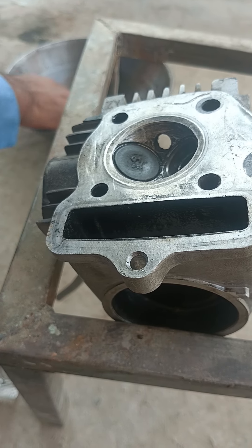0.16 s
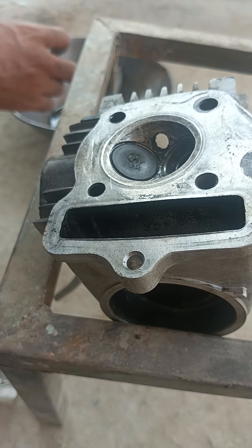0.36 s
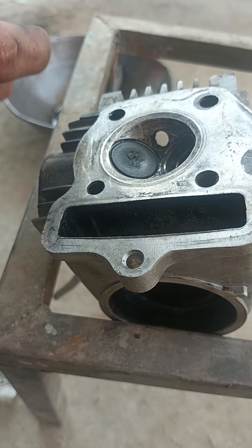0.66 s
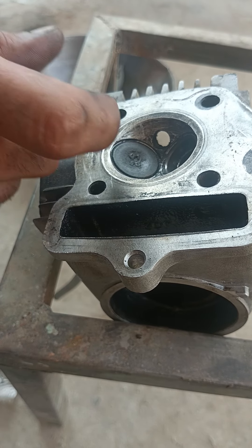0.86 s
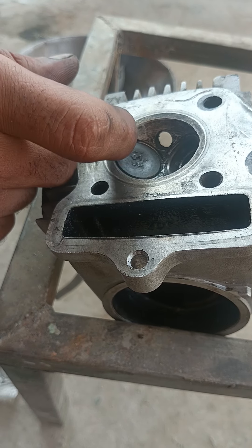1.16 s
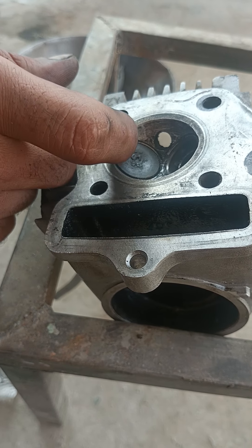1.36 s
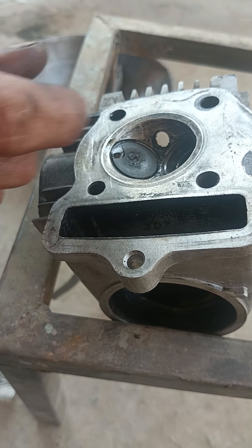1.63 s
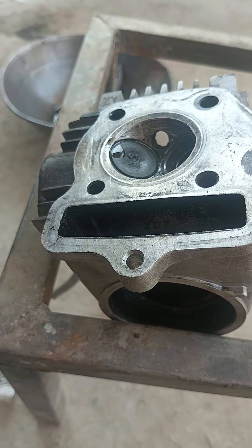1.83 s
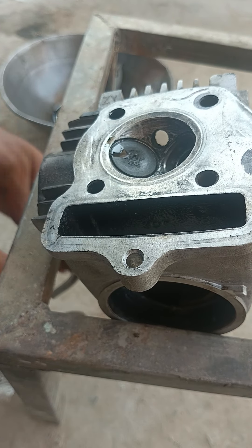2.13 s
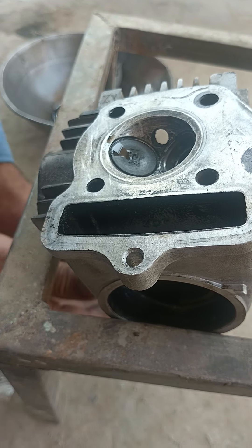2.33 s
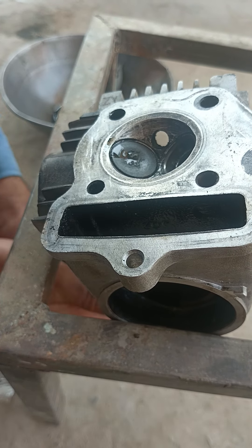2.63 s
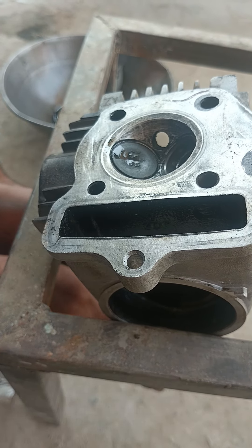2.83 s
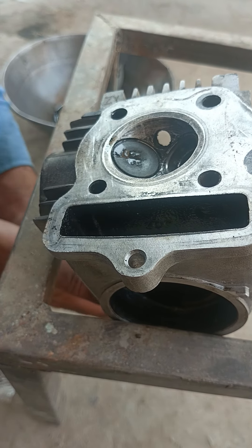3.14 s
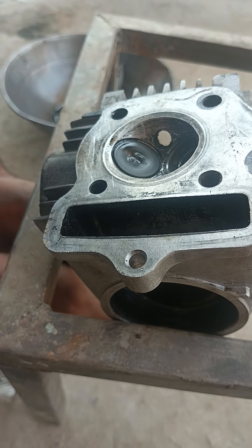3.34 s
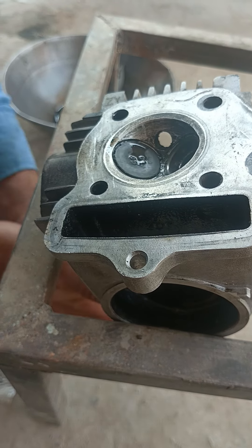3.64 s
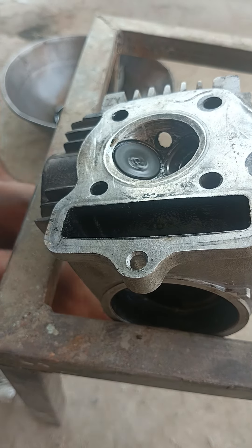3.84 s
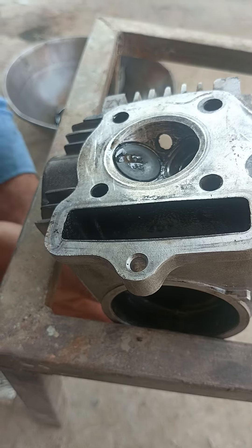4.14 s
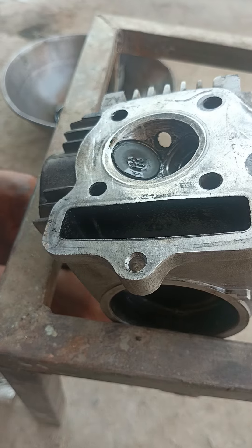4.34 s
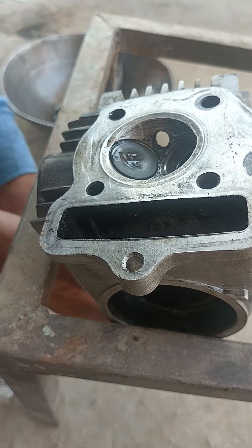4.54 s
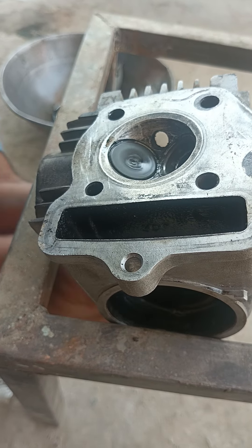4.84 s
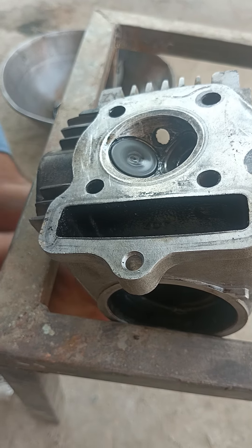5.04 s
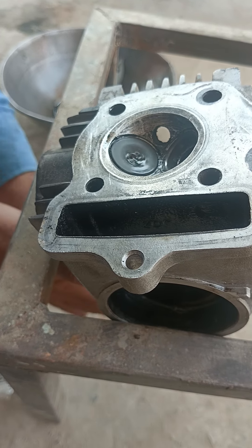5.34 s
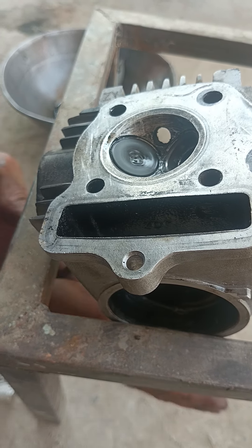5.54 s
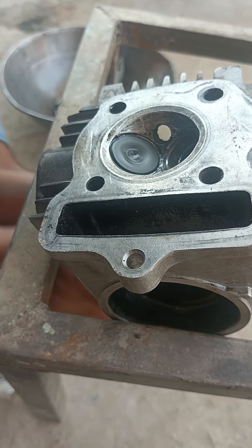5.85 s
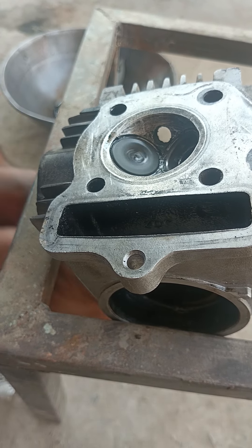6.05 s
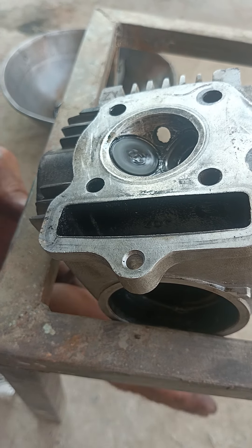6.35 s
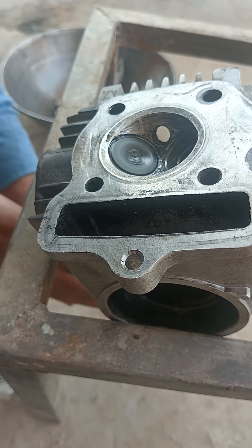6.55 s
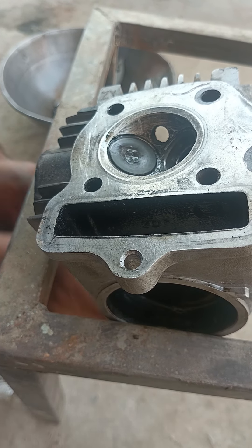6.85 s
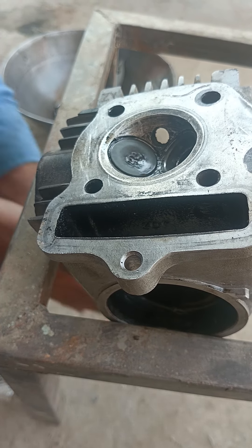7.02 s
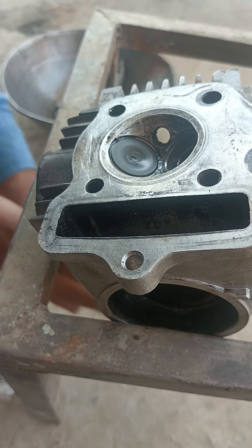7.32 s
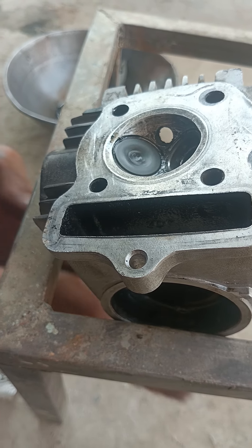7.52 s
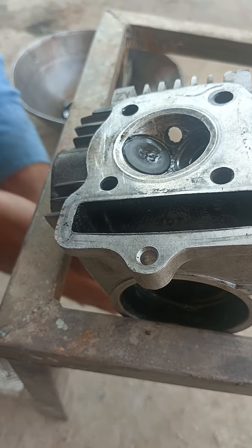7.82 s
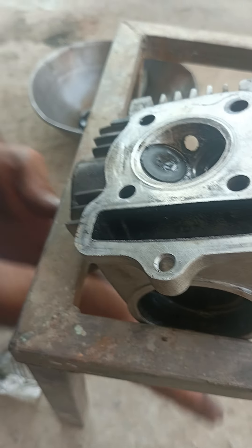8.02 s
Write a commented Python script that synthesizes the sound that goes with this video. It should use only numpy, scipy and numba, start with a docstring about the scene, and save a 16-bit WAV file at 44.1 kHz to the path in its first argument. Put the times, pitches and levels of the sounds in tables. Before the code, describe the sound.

A single-cylinder engine moves away along the street, its low exhaust pulsing and fading with the road noise while a distant engine hums at idle. After about three seconds, close by in an open workshop, a valve is twisted back and forth by hand in a metal cylinder head. Grinding paste crunches and the stem chatters in quick, even strokes, each with a brief high ringing squeak.

```python
"""A valve is lapped (ground into its seat) by hand in a small aluminium cylinder head, close by.
Each twist crushes grinding paste: the grit crackles through the head, the stem chatters, and the
valve catches and sings one high note. The workshop is open, so the street is heard too, alone for
the first three seconds: a single-cylinder engine moves away with its exhaust pulsing, road noise
fades, and a far engine keeps idling."""
import sys
import numpy as np
from scipy import signal
from scipy.fft import rfft, irfft
from scipy.io import wavfile
from scipy.ndimage import uniform_filter1d
from numba import njit

SR = 44100
rng = np.random.default_rng(int(sys.argv[2]) if len(sys.argv) > 2 else 0)


def unload_audio(sound):
    """Save the sound as a 16-bit wav file, at the path given as the first command line argument."""
    columns = np.transpose(np.atleast_2d(sound))
    # keep every value between -1 and 1, then stretch to whole-number steps
    steps = np.round(np.clip(columns, -1, 1) * 32767)
    wavfile.write(sys.argv[1], SR, steps.astype(np.int16))


N = 360738
T = np.arange(N) / SR

# How fast the departing engine fires. Each row: time in seconds, firings per second.
FIRING_RATE = [(0, 32.7), (1.4, 32.2), (2.6, 33), (4.3, 34.05), (7.8, 34.4), (7.95, 36.6)]
# How loud its exhaust is. Each row: time in seconds, level in dB.
EXHAUST_LEVEL = [(0, -16), (.2, -14), (.28, -17), (.77, -12), (1.05, -16), (1.3, -19.5), (2.05, -26),
                 (2.2, -23.8), (2.8, -28), (3.4, -29.8), (3.8, -34), (4.7, -37.5), (6.3, -39.5),
                 (8.18, -39.5)]
# The pitch that the street boosts as the vehicle moves. Each row: time in seconds, pitch in Hz.
BOOM_PITCH = [(0, 162), (.45, 165), (.65, 195), (1, 131), (1.25, 135), (1.6, 168), (5.5, 160), (6.8, 138)]
# The hum of the idling engine. Each row: time in seconds, pitch in Hz.
IDLE_PITCH = [(0, 103), (1.6, 102.8), (2.6, 101.6), (4.6, 101.6), (5.8, 103)]
# How loud that hum is. Each row: time in seconds, level in dB.
IDLE_LEVEL = [(0.0, -36), (0.5, -26), (1.91, -38), (1.98, -30), (2.25, -38), (2.66, -29), (2.8, -38),
              (3.23, -25), (3.74, -37), (5.06, -41), (5.9, -36), (6.27, -56), (7.22, -39), (7.36, -48),
              (8.0, -43), (8.18, -48)]
# How loud the street is. Each row: time in seconds, road rumble in dB, tyre hiss in dB.
STREET_LEVELS = [(0, -35.3, -41.3), (1, -35.3, -42.5), (1.75, -33.3, -41.8), (2.5, -37.7, -48),
                 (3.4, -41.3, -54.5), (6.3, -51, -52.5), (8.18, -52, -52)]
# The traffic's faint whine: pitch in Hz, width in Hz, level in dB compared with the rumble.
TRAFFIC_WHINE = (1410, 30, -5)
# The tone of exhaust, road rumble and tyre hiss. Each row: frequency in Hz, relative level in dB.
EXHAUST_TONE = [(30, -39), (65, -24.5), (98, -17.5), (128, -2), (165, -2), (195, -1), (230, -12),
                (295, -2.5), (360, -8), (450, -21), (700, -29), (1500, -44.5), (8000, -100)]
RUMBLE_TONE = [(25, -25), (50, -17), (85, 0), (150, 9.5), (330, 6.5), (500, -1), (700, -1), (1000, 1),
               (1450, 1), (2000, -5.5), (3000, -11.5), (5000, -22), (9000, -42), (12000, -64)]
HISS_TONE = [(1000, -10), (3000, 3), (5000, 0), (7000, -5), (9000, -12.5), (10500, -27), (12000, -31),
             (15500, -31)]

# Forward twists pull the valve onto its seat. Each row: start, time to top speed and time to fade 20 dB
# in seconds, grit and chatter levels in dB, wait for the note and its length in seconds, note level in dB.
FORWARD_TWISTS = [(3.355, .078, .065, -36, -29, .04, .04, -27.5),
                  (3.663, .023, .115, -35, -31, .015, .012, -40),
                  (4.122, .047, .116, -28, -25.5, .03, .006, -22),
                  (4.537, .047, .125, -23.2, -25.5, .012, .058, -16),
                  (4.938, .062, .135, -24, -23, .015, .08, -20.5),
                  (5.335, .085, .068, -22.7, -24.5, .028, .06, -22.5),
                  (5.732, .112, .075, -23.5, -26.5, .048, .03, -18),
                  (6.14, .036, .15, -21.3, -26.5, .055, .04, -19),
                  (6.538, .06, .125, -21.5, -25.5, .07, .04, -17.8),
                  (6.955, .077, .13, -23, -29, .035, .075, -20.5),
                  (7.335, .072, .13, -22.3, -25.5, .015, .08, -27),
                  (7.747, .058, .15, -23.8, -27.5, .078, .065, -22.5),
                  (8.143, .03, .12, -25, -22, .025, .02, -22.5)]
# Return twists swell slowly and chatter late. The columns are the same.
RETURN_TWISTS = [(3.884, .094, .048, -30.8, -25.7, .028, .065, -27),
                 (4.318, .07, .085, -29.8, -29, .03, .036, -22.5),
                 (4.735, .088, .075, -29, -24.5, .045, .062, -24.5),
                 (5.135, .05, .17, -25.7, -25, .028, .035, -18),
                 (5.525, .08, .13, -28.3, -26, .04, .1, -26.5),
                 (5.929, .088, .095, -27.5, -27, .04, .06, -26),
                 (6.335, .091, .09, -25.3, -23.3, .07, .028, -24.5),
                 (6.735, .064, .08, -29.3, -31.5, .066, .023, -21),
                 (7.16, .09, .085, -27, -24.3, .068, .055, -19.5),
                 (7.55, .1, .04, -28, -27.5, .072, .03, -16), (7.96, .094, .09, -26, -29, .058, .052, -23)]
# What all twists in one direction share: fade-in in seconds, softer start of the grit in dB, time to
# strongest chatter in seconds, softer start of the chatter in dB, then the seconds that the chatter
# takes to fade 20 dB and the note to fade 60 dB.
FORWARD_SHAPE = (.01, 7.5, .068, 5, .12, .36)
RETURN_SHAPE = (.022, 10, .114, 20, .078, .24)
# The bite into fresh paste: level in dB, the grit level in dB that gives it, extra dB per dB of grit.
PASTE_BITE = (-25.5, -23, .35)
# One extra rattle of the loose stem: start, time to peak and time to fade 20 dB in seconds, level in dB.
STEM_RATTLE = (6.86, .055, .09, -33)
# The tone of crushed grit, stem chatter and shattering grains.
# Each row: frequency in Hz, relative level in dB.
GRIT_TONE = [(300, -41), (800, -16), (1500, -8), (2500, -8), (2850, -2), (3550, -4), (4300, 4), (4900, -6),
             (6800, -4), (7700, -13), (9000, -11), (10500, -17), (12000, -28), (15500, -25)]
CHATTER_TONE = [(400, -31), (800, -10), (1250, -8), (1600, -1), (2200, -3.5), (2500, -12), (2950, -7),
                (3550, -12), (4200, -8), (5000, -22), (8000, -55)]
SHATTER_TONE = [(3000, -22), (9000, 0.5), (10500, -1.5), (12000, -10), (13500, 0), (15500, 3)]
# How head and valve ring. Each row: pitch in Hz, width in Hz, height above the broad tone in dB.
HEAD_RINGS = [(1081, 16, 9.5), (1423, 12, 16.5), (1549, 56, 8), (1664, 13.7, 14), (1807, 11, 16),
              (2080, 12, 11), (2161.5, 16, 9.5), (3310, 79.5, 7), (3550, 10, 10), (3800, 12, 9),
              (4087, 14, 11), (4475, 25, 16), (5260, 23, 7), (5329, 42, 11), (5410, 75, 11.5),
              (5650, 29, 12), (5772, 28, 18), (5972, 17, 16), (6140, 18, 14), (6400, 44, 6), (6484, 34, 15),
              (6729, 22, 7), (7198, 24, 15.5), (7467, 29, 11), (8070, 25, 8.5), (8258, 22, 12.5),
              (8730, 54, 11.5), (9080, 38, 15.5), (9790, 16, 9), (12995, 50, 9)]

# The frequency range in which each sound's level is set: low edge and high edge in Hz.
EXHAUST_BAND, RUMBLE_BAND = (115, 420), (470, 750)
TREBLE_BAND, CHATTER_BAND, SHATTER_BAND = (4900, 10000), (1300, 2300), (10000, 15500)


def undb(db):
    """Turn decibels into a number to multiply by."""
    return 10 ** (np.asarray(db) / 20)


def unit(x):
    """Scale a signal to an average (rms) level of 1."""
    return x / np.sqrt(np.mean(x ** 2))


def curves(rows):
    """Join a table's rows with straight lines, giving one value per sample for each column after time."""
    times, *columns = np.transpose(rows)
    return [np.interp(T, times, column) for column in columns]


def wander(rate):
    """A smooth random wobble of size about 1, with `rate` new values a second."""
    hold = max(int(SR / rate), 1)
    steps = np.repeat(rng.standard_normal(N // hold + 1), hold)
    return unit(uniform_filter1d(uniform_filter1d(steps, hold), hold)[:N])


def shape_tone(x, tone, band, rings=(), size=16384):
    """Give a sound a broad tone and ringing peaks; white noise of level 1 ends at level 1 in `band`."""
    freqs = np.arange(size // 2 + 1) * SR / size
    tone_hz, tone_db = np.transpose(tone)
    gain = undb(np.interp(np.log(freqs + 1), np.log(tone_hz), tone_db))
    peaks = sum(undb(db) ** 2 / (1 + (2 * (freqs - hz) / width) ** 2) for hz, width, db in rings)
    gain *= np.sqrt(1 + peaks)
    in_band = (freqs > band[0]) & (freqs < band[1])
    gain /= np.sqrt(np.mean(gain ** 2 * in_band))
    # make the ringing come after each hit, never before it (minimum phase)
    cepstrum = irfft(np.log(gain))
    cepstrum[1:size // 2] *= 2
    cepstrum[size // 2 + 1:] = 0
    return signal.fftconvolve(x, irfft(np.exp(rfft(cepstrum))))[:N]


@njit
def resonance(x, hz, width_hz):
    """Let through a narrow band around a pitch that can move (a state-variable filter)."""
    out, band_state, low_state = np.empty(len(x)), 0., 0.
    for i in range(len(x)):
        tuning, damping = np.tan(np.pi * hz[i] / SR), width_hz / hz[i]
        band = (band_state + tuning * (x[i] - low_state)) / (1 + tuning * (tuning + damping))
        band_state = 2 * band - band_state
        low_state += 2 * tuning * band
        out[i] = damping * band
    return out


def reflections(x, centres_hz, width_hz):
    """Reflections hold back the frequencies near each centre, smearing the pulses (all-pass filters)."""
    radius = np.exp(-np.pi * width_hz / SR)
    for hz in centres_hz:
        poles = [1, -2 * radius * np.cos(2 * np.pi * hz / SR), radius * radius]
        x = signal.lfilter(poles[::-1], poles, x)
    return x


def departing_engine(scatter_db=1.5, jitter_s=.00015, gas_db=-10, boom_db=3.3, boom_width_hz=33.):
    """One exhaust pulse per firing with a puff of gas behind it, booming between the house fronts."""
    (rate,), (level_db,), (boom_hz,) = curves(FIRING_RATE), curves(EXHAUST_LEVEL), curves(BOOM_PITCH)
    cycles = (np.cumsum(rate) - 1.5 * rate[0]) / SR
    firings = np.flatnonzero(np.diff(np.floor(cycles)))
    timing, strength = rng.standard_normal((len(firings), 2)).T
    firings += (jitter_s * SR * timing).astype(int)
    pulses = np.zeros(N)
    pulses[np.clip(firings, 0, N - 1)] = undb(scatter_db * strength)
    gas = unit(np.exp(-(cycles % 1) / .98) * rng.standard_normal(N))
    puffs = unit(pulses) + undb(gas_db) * gas
    smeared = reflections(puffs, centres_hz=(135.3, 160, 190, 290.2, 335.3), width_hz=34)
    exhaust = shape_tone(smeared, EXHAUST_TONE, EXHAUST_BAND)
    boom = undb(boom_db) * resonance(exhaust, boom_hz, boom_width_hz)
    return unit(exhaust + boom) * undb(level_db - .4)


def idling_engine(lower_tone_db=-18):
    """A far engine hums at three times its firing rate, with a weaker tone at twice that rate."""
    (hz,), (level_db,) = curves(IDLE_PITCH), curves(IDLE_LEVEL)
    phase = 2 * np.pi * np.cumsum(hz + .41 * wander(8)) / SR
    hum = np.sin(phase) + undb(lower_tone_db) * np.sin(phase * 2 / 3)
    return np.sqrt(2) * undb(level_db - .2 + .7 * wander(12)) * hum


def road_noise():
    """Road rumble, tyre hiss and a faint whine, fading as the vehicle leaves."""
    rumble_db, hiss_db = curves(STREET_LEVELS)
    rumble = shape_tone(rng.standard_normal(N), RUMBLE_TONE, RUMBLE_BAND)
    rumble *= undb(rumble_db - .6 + .68 * wander(14))
    hiss = shape_tone(rng.standard_normal(N), HISS_TONE, TREBLE_BAND)
    hiss *= undb(hiss_db - .5 + .4 * wander(10))
    hz, width_hz, whine_db = TRAFFIC_WHINE
    whine = unit(resonance(rng.standard_normal(N), np.full(N, float(hz)), float(width_hz)))
    return rumble + hiss + undb(rumble_db + whine_db) * whine


def twist(start, peak_s, fade_s, soft_db, attack_s=.011):
    """The strength of one turn of the stem: it takes hold, gathers speed and slows to a stop."""
    during = (T > start) & (T < start + .5)
    age, strength = T[during] - start, np.zeros(N)
    swell_db = -soft_db * np.clip(1 - age / peak_s, 0, 1) ** 2
    fade_db = -20 * (np.maximum(age - peak_s, 0) / fade_s) ** 1.45
    strength[during] = np.minimum(age / attack_s, 1) * undb(swell_db + fade_db)
    return strength


def paste_bites(rise_s=.005, decay_s=.024):
    """The strength of the short crunch that starts each forward twist, greater when the twist is hard."""
    bite_db, usual_db, share = PASTE_BITE
    bite = np.zeros(N)
    for start, _, _, grit_db, *_ in FORWARD_TWISTS:
        gain = undb(bite_db + share * (grit_db - usual_db))
        bite += gain * np.clip((T - start) / rise_s, 0, 1) * np.exp(-np.abs(T - start) / decay_s)
    return bite


def valve_catch(start, length_s, ring_s, rise_s=.009):
    """The strength of one note: the valve catches, is driven for a moment, then rings down."""
    age = T - start
    rise = np.exp(-(np.minimum(age, 0) / rise_s) ** 2)
    return rise * undb(-60 * np.maximum(age - length_s, 0) / ring_s)


def hand_motion():
    """Twisting back and forth sets the grinding speed, the stem's wobble and the valve's swing."""
    speed, wobble, swing = np.zeros((3, N))
    for rows, shape in ((FORWARD_TWISTS, FORWARD_SHAPE), (RETURN_TWISTS, RETURN_SHAPE)):
        attack_s, grit_soft_db, chatter_peak_s, chatter_soft_db, settle_s, ring_s = shape
        for start, peak_s, fade_s, grit_db, chatter_db, wait_s, length_s, note_db in rows:
            speed += undb(grit_db) * twist(start, peak_s, fade_s, grit_soft_db, attack_s)
            wobble += undb(chatter_db) * twist(start, chatter_peak_s, settle_s, chatter_soft_db, attack_s)
            swing = np.maximum(swing, undb(note_db) * valve_catch(start + wait_s, length_s, ring_s))
    start, peak_s, fade_s, rattle_db = STEM_RATTLE
    wobble += undb(rattle_db) * twist(start, peak_s, fade_s, soft_db=11)
    return speed, wobble, swing


def grains(rate, spread_db):
    """Tiny cracks at random moments, about `rate` a second, a few much larger than the rest."""
    size = undb(spread_db * np.minimum(rng.exponential(size=N), 5))
    return unit((rng.random(N) < rate / SR) * size * rng.choice([-1, 1], N))


def cooling_fins(x, ring_s=.08, ring_db=-8):
    """The cooling fins and the steel stand ring briefly at many close pitches."""
    t = T[:SR // 2]
    tail = rng.standard_normal(len(t)) * undb(-60 * t / ring_s)
    ringing = signal.fftconvolve(x, tail / np.linalg.norm(tail))[:N]
    return (x + undb(ring_db) * ringing) / np.hypot(1, undb(ring_db))


def moving_contact(x, hz, width_hz, wander_hz, db):
    """The point of contact travels round the seat, so the band that it boosts wanders."""
    boosted = x + undb(db) * resonance(x, hz + wander_hz * wander(28), float(width_hz))
    return boosted * np.std(x) / np.std(boosted)


def grinding(speed, wobble, bite, grit_db=-.3, uneven_db=1.6, knock_db=1.5, shatter_db=8):
    """Paste breaks between valve and seat while the stem chatters in its guide; both ring the head."""
    pressure = undb(uneven_db * wander(130))
    crush = grains(rate=8000, spread_db=3.3) * np.hypot(speed, bite) * pressure
    grit = cooling_fins(shape_tone(crush, GRIT_TONE, TREBLE_BAND, HEAD_RINGS))
    grit = moving_contact(grit, hz=6100, width_hz=260, wander_hz=700, db=-8)
    knocks = grains(rate=2200, spread_db=1.6) * np.hypot(wobble, undb(knock_db) * bite) * pressure
    chatter = shape_tone(knocks, CHATTER_TONE, CHATTER_BAND, HEAD_RINGS)
    chatter = moving_contact(chatter, hz=1640, width_hz=80, wander_hz=110, db=-3)
    # grains shatter only under a hard, fast twist, so the highest crackle dies first
    cracks = grains(rate=3500, spread_db=3.6) * speed ** 2 * pressure
    shatter = cooling_fins(shape_tone(cracks, SHATTER_TONE, SHATTER_BAND, HEAD_RINGS))
    return undb(grit_db) * grit + chatter + undb(shatter_db) * shatter


def singing_valve(swing, speed, bite, pitch_hz=4488, kick_db=-3, rub_db=-5, rub_width_hz=22.):
    """The valve bends and rings: the bite kicks it, grit shakes it, friction drives it as it catches."""
    hz = pitch_hz + 5 * wander(70)  # the changing contact pulls the pitch slightly
    flutter_db = 1.7 * wander(65) + wander(200)
    strength = np.sqrt(2) * np.hypot(swing, undb(kick_db) * bite) * undb(.9 + flutter_db)
    shaken = undb(rub_db) * speed * unit(resonance(rng.standard_normal(N), hz, rub_width_hz))
    return strength * np.sin(2 * np.pi * np.cumsum(hz) / SR) + shaken


def scene():
    """The lapping at the bench over the sounds of the street, in one channel."""
    speed, wobble, swing = hand_motion()
    bite = paste_bites()
    lapping = grinding(speed, wobble, bite) + singing_valve(swing, speed, bite)
    return (lapping + departing_engine() + idling_engine() + road_noise())[None]


def record(dry, top_hz=15750):
    """The recorder cuts off the highest treble."""
    return signal.sosfilt(signal.ellip(10, .2, 80, top_hz, fs=SR, output="sos"), dry)


dry = scene()
out = record(dry)
unload_audio(out)
```